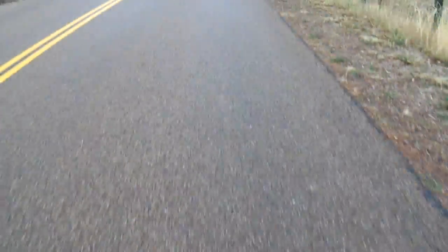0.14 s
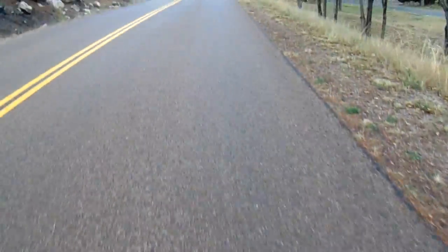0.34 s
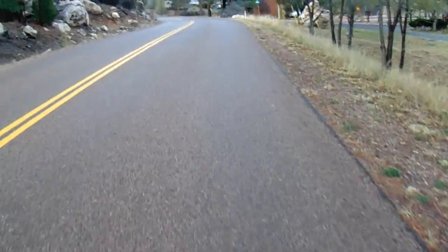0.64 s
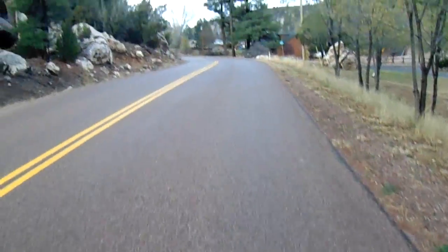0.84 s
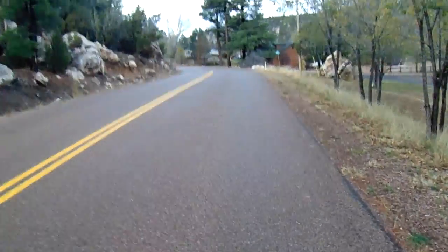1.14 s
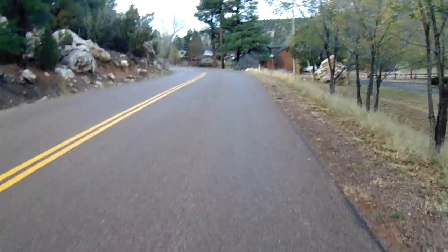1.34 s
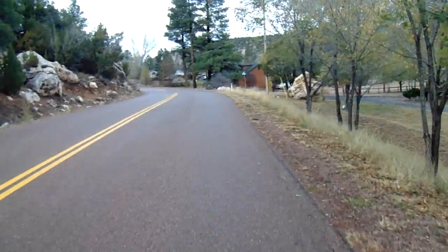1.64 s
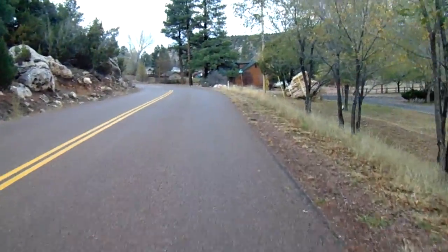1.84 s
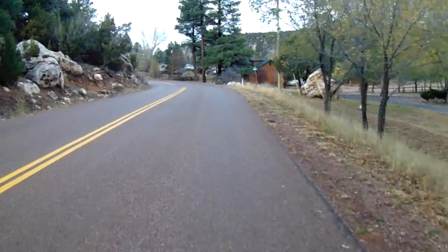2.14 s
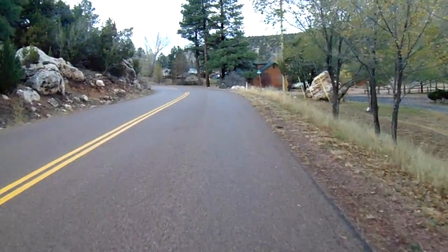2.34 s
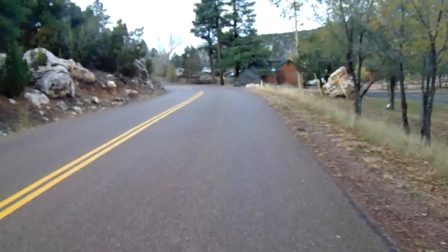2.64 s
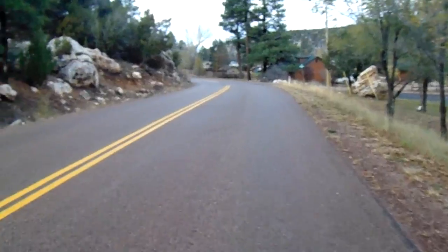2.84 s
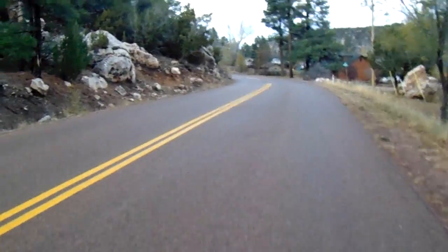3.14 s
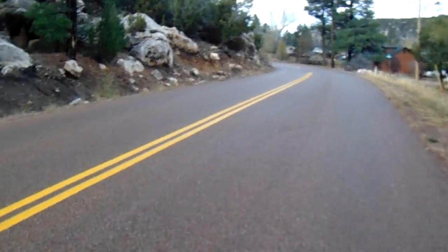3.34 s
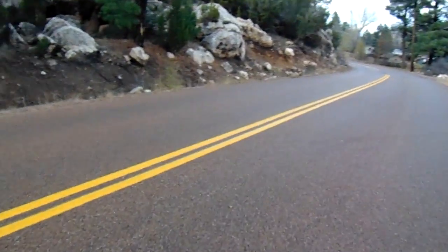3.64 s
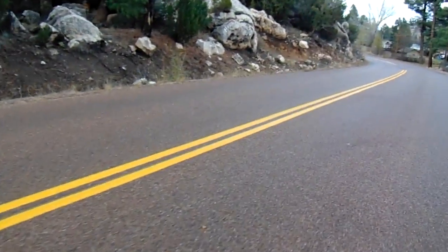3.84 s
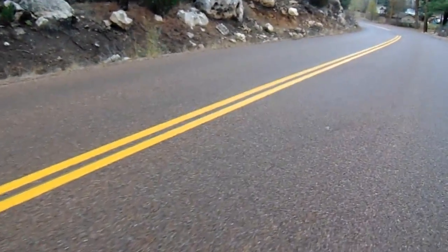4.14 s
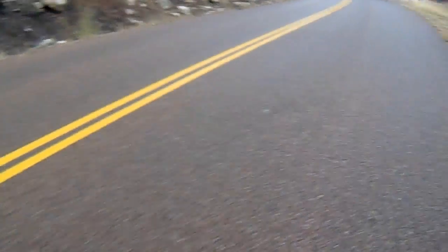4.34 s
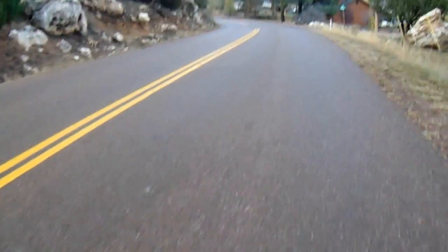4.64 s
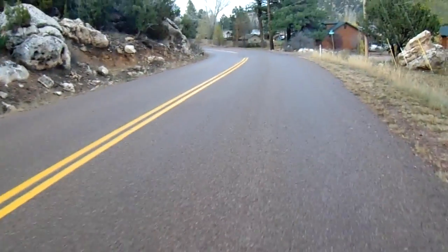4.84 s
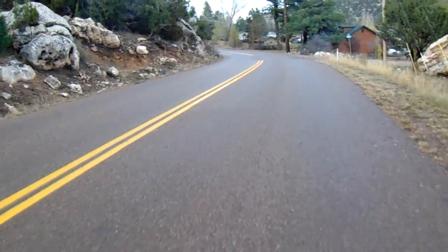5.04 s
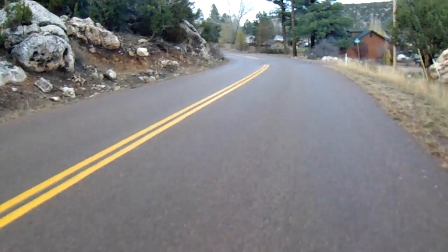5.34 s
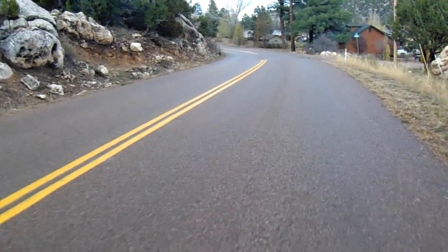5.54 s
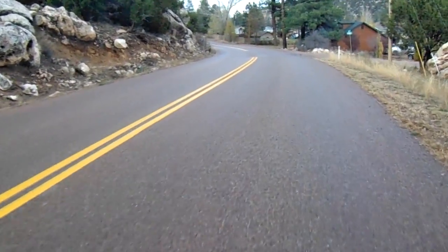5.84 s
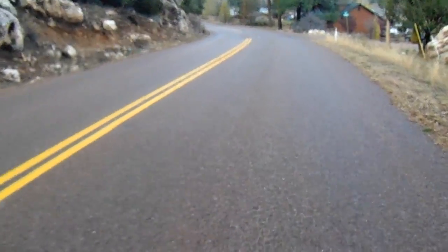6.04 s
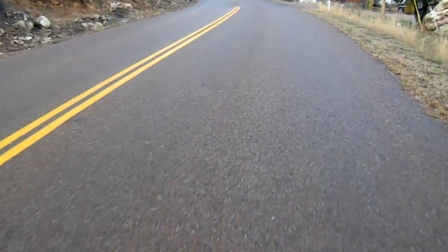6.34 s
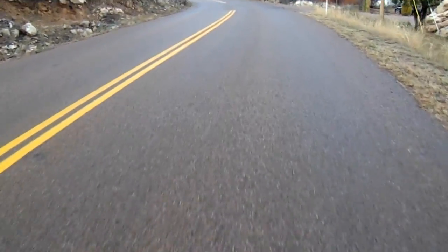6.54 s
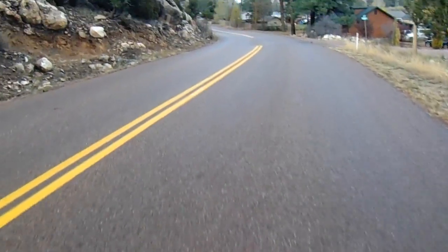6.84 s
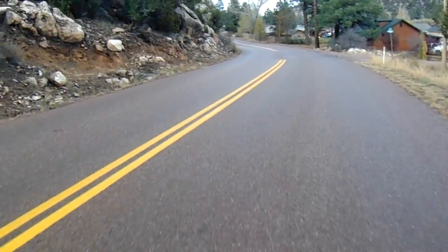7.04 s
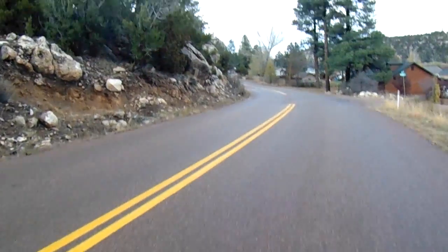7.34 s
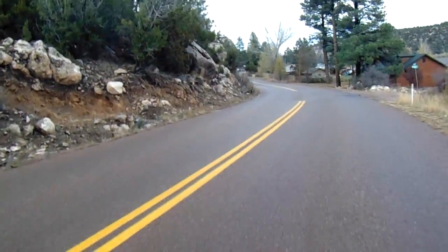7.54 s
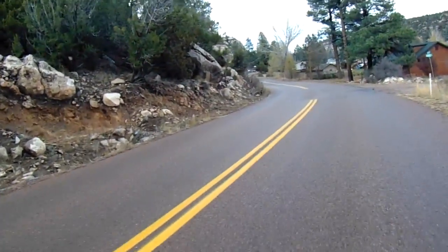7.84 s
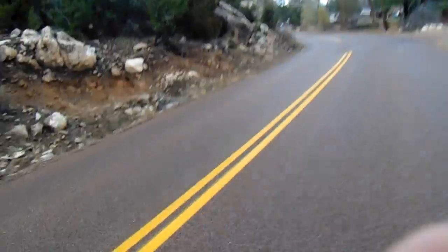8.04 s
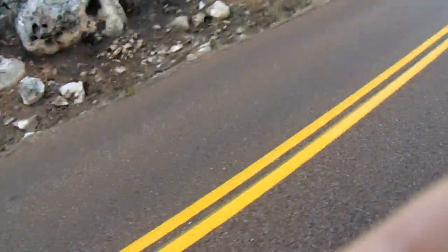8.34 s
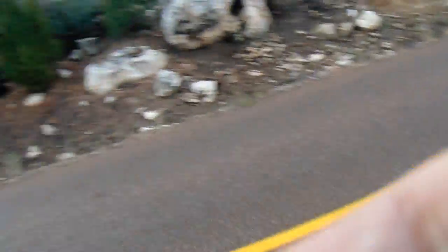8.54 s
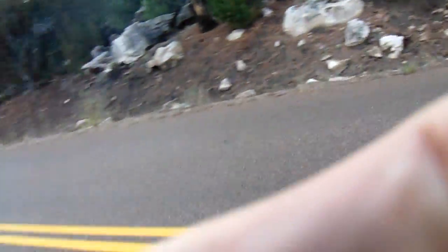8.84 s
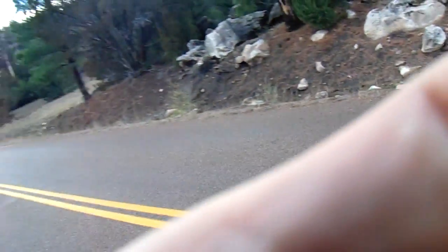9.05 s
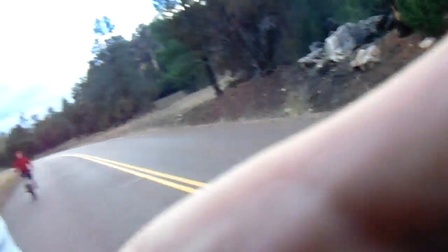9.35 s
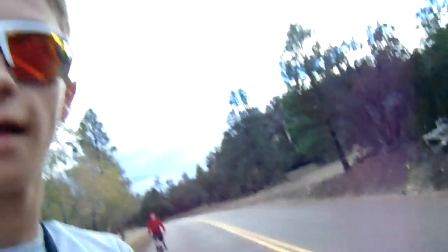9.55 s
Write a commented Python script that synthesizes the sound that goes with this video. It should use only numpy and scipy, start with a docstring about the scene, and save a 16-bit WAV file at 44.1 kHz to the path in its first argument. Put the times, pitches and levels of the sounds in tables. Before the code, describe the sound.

A longboard rolls fast down an asphalt road, its wheels and deck giving a continuous hum and rough roar. Grit and small stones crackle under the wheels, and bumps knock hollowly on the deck, mostly early on. Wind buffets the handheld microphone in low gusts that grow stronger later, with a few thumps. Fingers rub faintly on the case, and the rolling eases near the end.

```python
"""Longboard on asphalt

A longboard rolls fast down a road, heard from a camera in the rider's hand. The rough road
makes wheels and deck hum and roar, the bearings whirr, and grit and stones crunch under the
wheels. Bumps knock the deck, and one stone pings off a truck (the metal axle mount).
Gusts buffet the microphone, and now and then fingers rub on the camera's case."""
import sys
import numpy as np
from scipy import signal
from scipy.fft import rfft, irfft, next_fast_len
from scipy.io import wavfile
from scipy.ndimage import uniform_filter1d

SR = 44100
rng = np.random.default_rng(int(sys.argv[2]) if len(sys.argv) > 2 else 0)


def master(y):
    """Save y as 16-bit WAV."""
    cut = np.clip(np.atleast_2d(y).T, -1, 1)
    pcm = np.round(cut * 32767)  # scale
    wavfile.write(sys.argv[1], SR, pcm.astype(np.int16))


N = 426888
TIME = np.arange(N) / SR

# Levels in the tables are relative: the functions add their own gains and filters.
# the ride, as road surface and stance change: t/s, hum level/dB, roar level/dB, grit level/dB
RIDE_LEVELS = [(0.0, -24, -31.5, -51), (0.3, -22.5, -29.5, -46.5), (0.7, -27.5, -31.5, -60),
               (1.05, -25.5, -32, -50.0), (1.8, -22.5, -28.5, -48), (2.8, -22.5, -29, -49.5),
               (3.2, -22.5, -28, -48.5), (4.05, -24, -31, -48), (4.4, -22, -29.5, -42.5),
               (4.95, -17, -27, -46.0), (5.35, -25.5, -35.5, -53.5), (6.0, -23.0, -32.5, -52.0),
               (6.9, -20, -27.5, -43), (7.5, -19.5, -28, -45), (8.2, -27, -37, -57.0),
               (8.65, -28.5, -32.5, -56), (9.15, -29, -36, -55.5), (9.68, -24.5, -34, -58.5)]
# the notes at which wheels and deck hum: f/Hz, width/Hz, level/dB
HUM_RESONANCES = [(438.4, 38, -2), (390, 92.6, -8)]
# the tone of the hum: f/Hz, level/dB
HUM_SPECTRUM = [(100, -21), (250, 2.5), (400, -3.5), (445, -1.5), (490, -7), (700, -13), (1500, -30.5)]
# the tone of the shaking trucks and deck: f/Hz, level/dB
ROAR_SPECTRUM = [(25, -22), (70, -23.5), (110, -7), (140, -0.5), (170, -3.5), (330, 3), (520, 3),
                 (780, -9.5), (1000, -14), (1450, -21), (2000, -23.5), (4000, -38.5), (11000, -41.5)]
# the notes that ring on top of the roar: f/Hz, width/Hz, level/dB
ROAR_RESONANCES = [(521.4, 38, -0.5), (637, 89, -6.5), (770, 58, -6.5), (1013, 114, -21.5), (1253, 48, -21)]
# the bearings' whirr, which drops as the microphone swings behind the rider: t/s, level/dB
WHIRR_LEVELS = [(0, -58), (1.5, -51), (7.0, -58), (8.9, -52.5), (9.5, -66)]
# the notes at which the bearings ring: f/Hz, width/Hz, level/dB
BEARING_RESONANCES = [(1210, 130, 0), (1825, 140, 14), (2310, 69, -8), (3020, 320, -15), (3410, 120, -19)]
# the tone of a grain's dull crack: f/Hz, level/dB
CRACK_SPECTRUM = [(300, -14), (1000, -3), (1850, 7.5), (2600, 3), (2950, 3.5), (3200, -1.5), (3450, 6.5),
                  (3750, 2.5), (4250, -3), (4900, -1.5), (5900, -5.5), (7500, -11), (11000, -19.5)]
# the tone of a grain's bright snap: f/Hz, level/dB
SNAP_SPECTRUM = [(1500, 0), (3400, -24), (4200, -5), (5000, -1), (6200, 4.5), (8200, 3.5), (10000, 0),
                 (10800, -1.5)]
# the notes that a cracking grain rings in a wheel: f/Hz, width/Hz, level/dB
WHEEL_RESONANCES = [(1800, 93, 9), (2200, 210, 2.5), (3060, 300, 6), (3510, 150, 4), (4680, 970, -2),
                    (6070, 720, 0)]
# gusts on the microphone: start t/s, length/s, level/dB
WIND_GUSTS = [(1.084, 0.2, -29), (1.418, 0.07, -32), (1.507, 0.064, -23.5), (1.838, 0.096, -33.5),
              (2.322, 0.075, -29.5), (2.487, 0.23, -25.5), (3.06, 0.21, -28.5), (3.274, 0.045, -19),
              (3.367, 0.07, -21.5), (3.594, 0.13, -17), (3.817, 0.024, -16.5), (3.94, 0.13, -24),
              (4.865, 0.51, -16), (7.05, 0.16, -36), (7.358, 0.1, -28), (7.46, 0.62, -14.5),
              (8.61, 0.17, -15.5), (8.857, 0.079, -22), (9.193, 0.24, -23), (9.429, 0.19, -16.5)]
# the tone of the wind: f/Hz, level/dB
WIND_SPECTRUM = [(10, -35), (25, 0.5), (40, -1), (90, 1), (150, 0), (250, -7), (400, -18), (700, -27.5),
                 (1500, -57), (4000, -78), (11000, -64.5)]
# how squarely the wind meets the microphone's opening, heard as its depth: t/s, bass level/dB
WIND_BASS_LEVELS = [(0, -14), (0.9, -14), (1.2, 5), (3.4, 3), (5.2, 0), (7.8, 1), (9.0, -5.5), (9.25, -8),
                    (9.68, -22)]
# fingers sliding on the case: start t/s, length/s, level/dB
FINGER_STROKES = [(0.056, 0.25, -51), (0.347, 0.06, -42.5), (1.255, 0.032, -39), (1.395, 0.052, -40.5),
                  (7.3, 0.76, -54), (8.3, 0.67, -59), (8.852, 0.35, -54.5), (9.49, 0.057, -51)]
# the tone of skin rubbing on the case: f/Hz, level/dB
RUB_SPECTRUM = [(500, -18), (2000, 3), (4000, -2), (5500, 2.5), (7500, 6.5), (9500, 6.5), (10800, 13.5)]
# the biggest stones crushed under a wheel: t/s, crack level/dB, snap level/dB
BIG_STONES = [(0.092, -26.5, -38), (0.1236, -26.5, -40), (0.4798, -31, -36), (1.262, -25, -28.5),
              (1.6308, -19, -31), (1.751, -30, -32.5), (1.8667, -23, -38), (2.1181, -20.5, -37),
              (2.228, -28, -43), (2.5538, -20, -38), (2.962, -24.5, -63), (3.1362, -22, -40),
              (3.161, -21, -41), (3.202, -27.5, -48), (3.3188, -26, -39), (3.7532, -43, -31),
              (4.385, -23.5, -42), (4.4138, -24, -35), (4.4889, -21.5, -35), (4.5806, -21, -37),
              (4.6487, -21, -45), (4.832, -25.5, -39), (5.1085, -27.5, -39), (6.124, -26.5, -37),
              (6.4115, -26.5, -31), (6.922, -28, -32.5), (6.9362, -27, -35), (7.317, -23.5, -24.5),
              (7.3567, -33, -33), (7.7779, -29, -29), (8.4612, -25.5, -39)]
# the biggest bumps in the asphalt: t/s, level/dB
BIG_BUMPS = [(0.206, -24.5), (0.31, -25), (0.366, -17), (0.482, -15), (0.676, -17.5), (0.712, -16.5),
             (0.855, -15), (1.021, -19.5), (1.148, -20.5), (2.371, -18), (2.437, -15.5), (2.642, -21),
             (2.676, -12), (2.844, -18.5), (3.637, -19), (5.124, -21), (6.935, -16), (7.315, -16.5)]
# the tone of a knock on the deck: f/Hz, level/dB
KNOCK_SPECTRUM = [(150, -8.5), (400, 3.5), (600, 3.5), (800, 1), (1100, -15.5), (1600, -17.5),
                  (3000, -26.5), (8000, -54)]
# the notes of a struck truck: f/Hz, level/dB, time to fade by 60 dB/s
TRUCK_NOTES = [(2260, -27.5, 0.11), (3450, -36, 0.049)]
# single swirls of air that thump the microphone: t/s, level/dB, half width/s
AIR_THUMPS = [(3.313, -0.5, 0.00096), (5.178, 3.5, 0.0014), (8.032, -10, 0.0023), (8.789, -5, 0.0014)]

# the light wind between gusts: its level, how far it wanders and how often
BREEZE_DB, BREEZE_SWING_DB, BREEZE_HZ = -40.5, 1.5, 4.1
# a gust rises and falls over a short time plus a share of its length
GUST_RISE_S, GUST_RISE_SHARE = 0.023, 0.093
GUST_FALL_S, GUST_FALL_SHARE = 0.028, 0.032
# small stones come at random; their levels are counted from the grit's
PEBBLES_PER_S, PEBBLE_CRACK_DB, PEBBLE_SNAP_DB, PEBBLE_SPREAD_DB = 6.8, 13.5, 9, 1.5
# a stone's pieces crack again: average gap, and loss from one crack to the next
FRAGMENT_GAP_S, FRAGMENT_LOSS_DB = 0.012, 7.0
# small bumps come at random; their level is counted from the roar's
RIPPLES_PER_S, RIPPLE_DB, RIPPLE_SPREAD_DB = 3.0, 2.5, 5.5
CUTOFF_HZ = 11020


def from_db(db):
    """Turn decibels into a factor to multiply by."""
    return 10 ** (np.asarray(db) / 20)


def in_time(rows):
    """Join a table's points with straight lines: one curve for each column after the time."""
    times, *columns = np.transpose(rows)
    return [np.interp(TIME, times, column) for column in columns]


def rms_one(x):
    """Scale a signal so that its average power is 1."""
    return x / np.sqrt(np.mean(x ** 2) + 1e-20)


def running_level(x, window_s):
    """How strong a signal is around each moment."""
    return np.sqrt(uniform_filter1d(x ** 2, int(window_s * SR)) + 1e-9)


def pass_filter(x, kind, hz, order=2):
    """Let the lows, the highs or a band through."""
    return signal.sosfilt(signal.butter(order, hz, kind, fs=SR, output="sos"), x)


def drift(rate_hz):
    """A smooth random curve, about 1 in size, that changes about rate_hz times a second."""
    step, warm_up = 20, 4000   # one point every 20 samples; the first points are dropped
    pole = np.exp(-2 * np.pi * rate_hz * step / SR)
    noise = rng.standard_normal(N // step + warm_up + 2)
    slow = signal.lfilter([1], [1, -2 * pole, pole * pole], noise)[warm_up:]
    return np.interp(np.arange(N) / step, np.arange(len(slow)), rms_one(slow))


def colour(x, spectrum):
    """Give a signal the tone of a spectrum table; white noise keeps its power."""
    size = 2 * next_fast_len(N // 2 + SR // 2)
    hz, db = np.transpose(spectrum)
    bins_hz = np.fft.rfftfreq(size, 1 / SR)
    gain = rms_one(from_db(np.interp(np.log(bins_hz + 1), np.log(hz), db)))
    # a minimum-phase filter: it rings after a hit, never before it
    cepstrum = irfft(np.log(gain))[:size // 2]
    cepstrum[1:] *= 2
    return irfft(rfft(x, size) * np.exp(rfft(cepstrum, size)))[:N]


def resonate(x, resonances):
    """Let a signal ring at several notes, added up with alternating signs."""
    out = 0
    for k, (hz, width, db) in enumerate(resonances):
        radius = np.exp(-np.pi * width / SR)
        poles = [1, -2 * radius * np.cos(2 * np.pi * hz / SR), radius ** 2]
        ring = (1 - radius ** 2) / 2 * signal.lfilter([1, 0, -1], poles, x)
        out = out + (-1) ** k * from_db(db) * ring
    return out


def lumpy_noise(rough_db, lumps_hz):
    """Noise whose level jumps about, like the push of coarse asphalt or swirling air."""
    return rng.standard_normal(N) * from_db(rough_db * drift(lumps_hz))


def crumble(power, decay_s):
    """Turn each pulse of power into a short burst of noise with the same energy."""
    pole = np.exp(-2 / (decay_s * SR))
    swell = signal.lfilter([(1 - pole) ** 2], [1, -2 * pole, pole * pole], power + 1e-18)
    return np.sqrt(np.abs(swell)) * rng.standard_normal(N)


def blows(times, level_db, length_s):
    """Bursts of noise at the given moments and levels."""
    power = np.zeros(N)
    power[(times * SR).astype(int)] = from_db(level_db) ** 2 * length_s * SR
    return crumble(power, length_s)


def scattered(per_s, spread_db, level_db, length_s):
    """Bursts of noise at random moments, their levels spread around a curve."""
    hit = rng.random(N) < per_s / SR
    sizes = from_db(level_db + spread_db * np.clip(rng.standard_normal(N), -2, 2))
    return crumble(hit * sizes ** 2 * length_s * SR, length_s)


def grains(per_s, spread_db, grain_s):
    """Grains of all sizes come under the wheels at random, in loose patches."""
    sizes = from_db(spread_db * np.minimum(rng.exponential(1, N), 3.2))
    hit = rng.random(N) < per_s * from_db(2.0 * drift(12)) / SR
    return rms_one(crumble(hit * sizes ** 2, grain_s))


def hum(level_db, steadiness):
    """Wheels and deck ring at their main note; the rider's weight keeps the push even."""
    ring = rms_one(colour(resonate(rng.standard_normal(N), HUM_RESONANCES), HUM_SPECTRUM))
    swell = running_level(ring, window_s=0.06)
    return from_db(level_db) * rms_one(ring / swell ** steadiness)


def roar(level_db, broad_db, ring_db, bite, patchy_db):
    """The road shakes trucks and deck into a broad noise, with weaker ringing on top."""
    broad = rms_one(colour(lumpy_noise(rough_db=3.0, lumps_hz=48.0), ROAR_SPECTRUM))
    rings = resonate(grains(per_s=500, spread_db=5.0, grain_s=0.0011), ROAR_RESONANCES)
    rings = rms_one(pass_filter(rings, "band", [250, 2000]))
    shake = from_db(broad_db) * broad + from_db(ring_db) * rings
    # coarse patches of asphalt are brighter as well as louder
    rasp = signal.sosfiltfilt(signal.butter(2, 900, "high", fs=SR, output="sos"), shake)
    rasp_db = bite * (level_db - level_db.mean()) + patchy_db * drift(5.6)
    return from_db(level_db) * (shake + (from_db(rasp_db) - 1) * rasp)


def bearings():
    """The spinning bearings add a faint, even metallic whirr."""
    level_db, = in_time(WHIRR_LEVELS)
    whirr = resonate(rng.standard_normal(N), BEARING_RESONANCES)
    return from_db(level_db) * rms_one(pass_filter(whirr, "low", 3800))


def grit(level_db, crack_db, ring_db, snap_db, both_db, sand_db):
    """Grains crack dully, snap brightly, do both, or ring the wheel; fine sand hisses under them."""
    both = from_db(both_db) * grains(per_s=64, spread_db=3.5, grain_s=0.0013)
    cracks = from_db(crack_db) * grains(per_s=100, spread_db=6.0, grain_s=0.0012)
    snaps = from_db(snap_db) * grains(per_s=45, spread_db=1.5, grain_s=0.00035)
    sand = from_db(sand_db) * rng.standard_normal(N)
    rings = resonate(grains(per_s=70, spread_db=2.5, grain_s=0.0012), WHEEL_RESONANCES)
    rings = from_db(ring_db) * rms_one(pass_filter(rings, "band", [1500, 6500]))
    dull = colour(cracks + both + sand, CRACK_SPECTRUM)
    bright = colour(snaps + both + sand, SNAP_SPECTRUM)
    return from_db(level_db) * (dull + bright + rings)


def gust(start, length):
    """The strength of one gust: it rises, holds and dies away, more slowly if it is long."""
    rise = np.clip((TIME - start) / (GUST_RISE_S + GUST_RISE_SHARE * length), 0, 1)
    since_end = np.maximum(TIME - start - length, 0)
    return rise * np.exp(-since_end / (GUST_FALL_S + GUST_FALL_SHARE * length))


def wind(lumpy_db, swirls_hz):
    """Air swirls at the microphone's opening and rumbles: a light breeze with gusts on top."""
    breeze = from_db(BREEZE_DB + BREEZE_SWING_DB * drift(BREEZE_HZ))
    gust_power = sum((from_db(db) * gust(start, length)) ** 2 for start, length, db in WIND_GUSTS)
    strength = np.sqrt(breeze ** 2 + gust_power)
    swirls = rms_one(colour(lumpy_noise(lumpy_db, swirls_hz), WIND_SPECTRUM))
    swirls /= running_level(swirls, window_s=0.08)   # even out slow swells, keep the quick lumps
    bass = pass_filter(swirls, "low", 130, order=1)
    bass_db, = in_time(WIND_BASS_LEVELS)
    return strength * (swirls + (from_db(bass_db) - 1) * bass)


def fingers(gain_db, rough_db, roundness):
    """Skin sliding on the case gives a thin, uneven hiss; each stroke swells and fades in one arch."""
    pressure = 0
    for start, length, db in FINGER_STROKES:
        progress = np.clip((TIME - start) / length, 0, 1)
        arch = np.abs(np.sin(np.pi * progress)) ** roundness   # below 1: crisper start and end
        pressure += from_db(db) * arch
    flicker = from_db(gain_db + rough_db * drift(74))
    return pressure * flicker * colour(rng.standard_normal(N), RUB_SPECTRUM)


def fragments(times, level_db, length_s, count=3):
    """Each stone's first crack and the weaker cracks of its pieces, at uneven gaps."""
    gaps = FRAGMENT_GAP_S * rng.uniform(.5, 1.5, (len(times), count))
    return sum(blows(times + gaps[:, :k].sum(axis=1), level_db - FRAGMENT_LOSS_DB * k, length_s)
               for k in range(count))


def stones(grit_db, crush_s, crack_gain_db, snap_gain_db, ring_gain_db):
    """A stone breaks in an instant: a crack that rings the wheel and a bright snap in the air."""
    times, crack_db, snap_db = np.transpose(BIG_STONES)
    cracks = fragments(times, crack_db, crush_s)
    cracks += scattered(PEBBLES_PER_S, PEBBLE_SPREAD_DB, grit_db + PEBBLE_CRACK_DB, crush_s)
    snaps = fragments(times, snap_db, crush_s)
    snaps += scattered(PEBBLES_PER_S, PEBBLE_SPREAD_DB, grit_db + PEBBLE_SNAP_DB, crush_s)
    dull = from_db(crack_gain_db) * colour(cracks, CRACK_SPECTRUM)
    bright = from_db(snap_gain_db) * colour(snaps, SNAP_SPECTRUM)
    rings = from_db(ring_gain_db) * resonate(cracks, WHEEL_RESONANCES)
    return dull + bright + rings


def knocks(roar_db, contact_s, gain_db):
    """A wheel meeting a bump gives a small hollow knock; rougher road knocks harder."""
    times, level_db = np.transpose(BIG_BUMPS)
    small = scattered(RIPPLES_PER_S, RIPPLE_SPREAD_DB, roar_db + RIPPLE_DB, contact_s)
    big = blows(times, level_db, contact_s)
    return from_db(gain_db) * colour(big + small, KNOCK_SPECTRUM)


def ping(start_s):
    """A stone flies against a metal truck, which rings briefly."""
    age = np.maximum(TIME - start_s, 0)
    return sum(from_db(db - 60 * age / fade_s) * np.sin(2 * np.pi * hz * age)
               for hz, db, fade_s in TRUCK_NOTES)


def thumps():
    """A strong swirl of air hits the microphone as one sharp swing of pressure."""
    swings = sum(from_db(db) * np.exp(-np.abs(TIME - t) / width) for t, db, width in AIR_THUMPS)
    return pass_filter(swings + 1e-18, "high", 25, order=1)


def scene():
    """The board below, wind and hand right at the microphone; the open road gives no echo."""
    hum_db, roar_db, grit_db = in_time(RIDE_LEVELS)
    board = from_db(-0.64) * hum(hum_db, steadiness=0.2)
    board += roar(roar_db, broad_db=3.5, ring_db=-3.0, bite=0.18, patchy_db=2.5)
    board += bearings()
    board += grit(grit_db, crack_db=-4.0, ring_db=-4.5, snap_db=-10.5, both_db=-6.5, sand_db=-12.5)
    board += stones(grit_db, crush_s=0.0013, crack_gain_db=-4.0, snap_gain_db=4.0, ring_gain_db=-5.0)
    board += knocks(roar_db, contact_s=0.0025, gain_db=0.5)
    board += ping(start_s=2.553)
    air = wind(lumpy_db=3.0, swirls_hz=30.2) + thumps()
    hand = fingers(gain_db=11.0, rough_db=2.5, roundness=0.57)
    return (board + air + hand)[None]


def record(dry):
    """Peaks beyond full level are flattened, then the highest treble is cut off steeply."""
    treble_cut = signal.ellip(12, .1, 80, CUTOFF_HZ, fs=SR, output="sos")
    return signal.sosfilt(treble_cut, np.clip(dry, -1, 1))


dry = scene()
out = record(dry)
master(out)
```